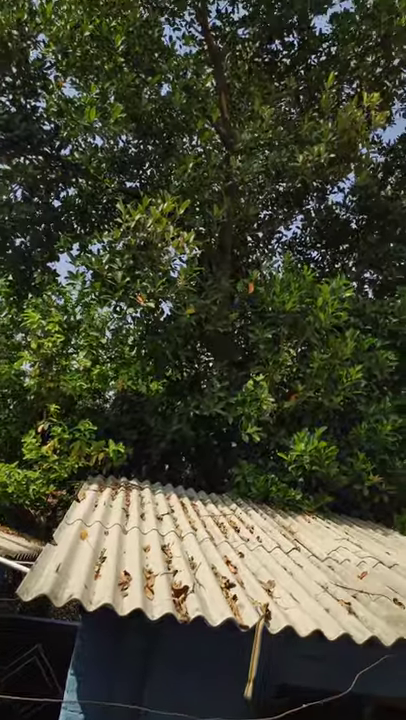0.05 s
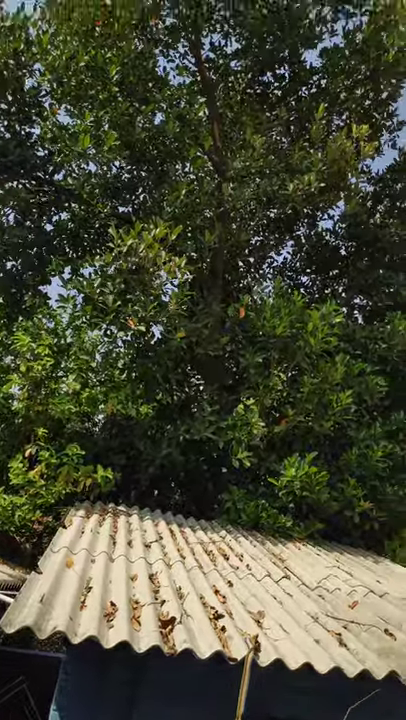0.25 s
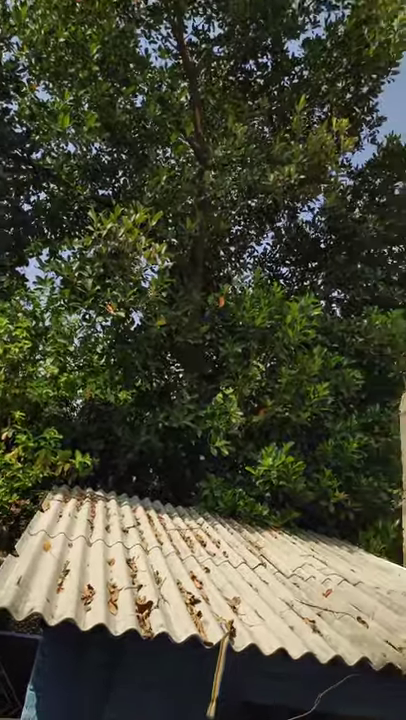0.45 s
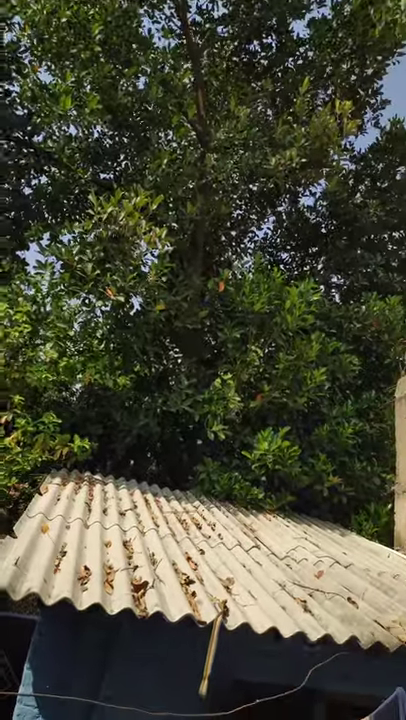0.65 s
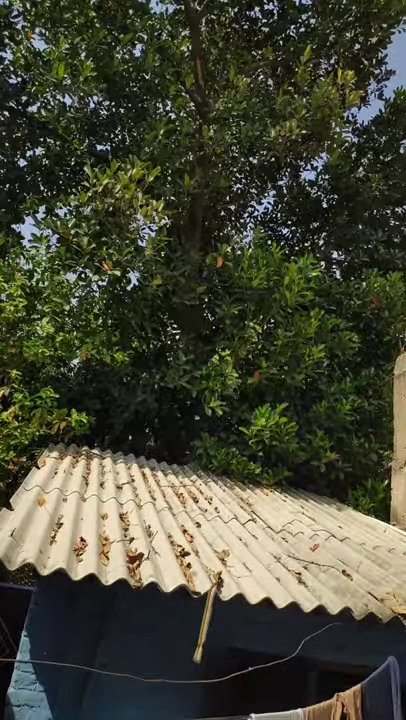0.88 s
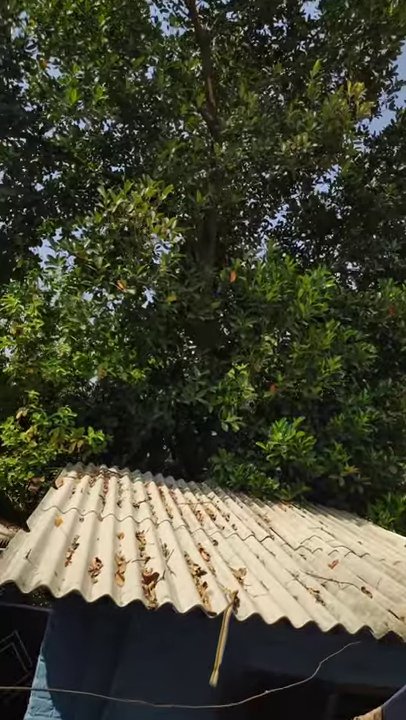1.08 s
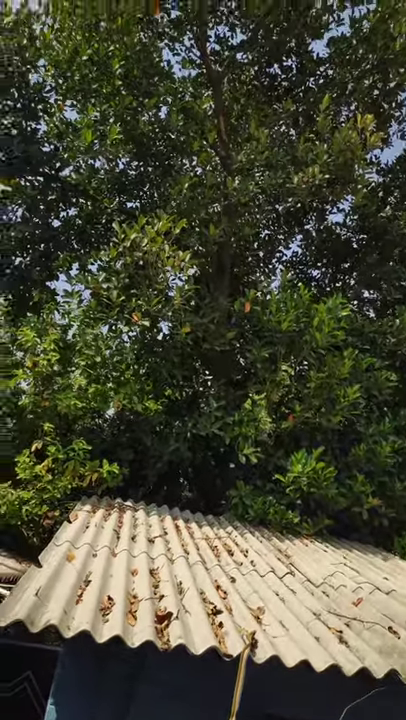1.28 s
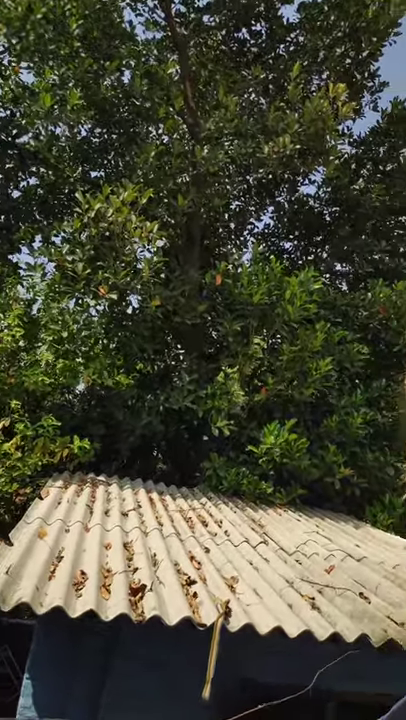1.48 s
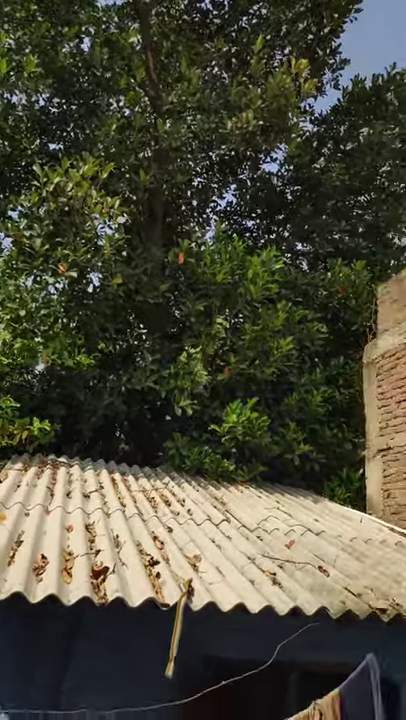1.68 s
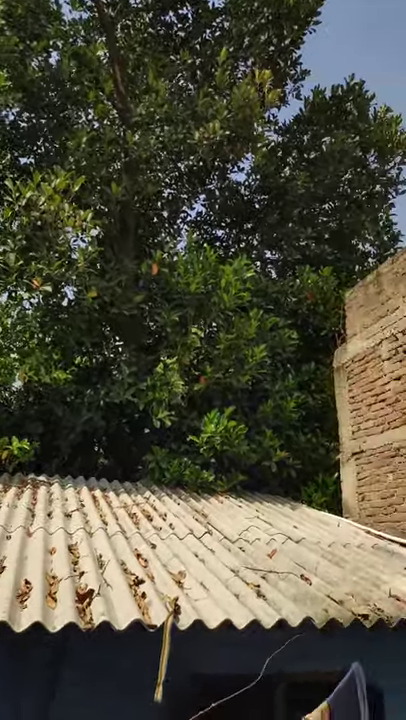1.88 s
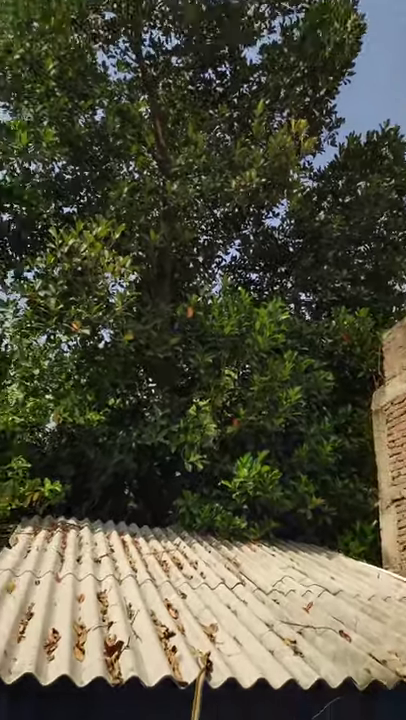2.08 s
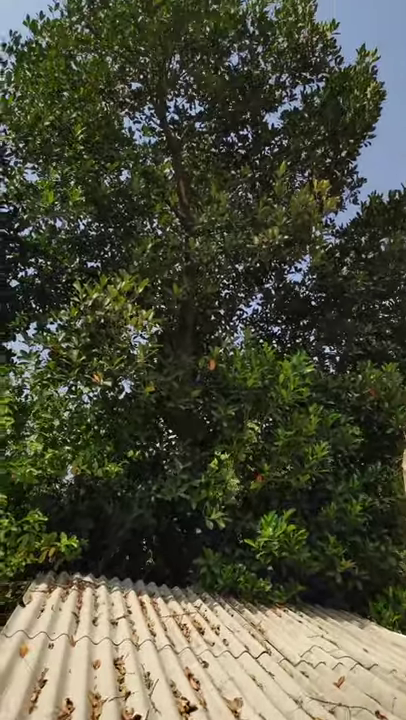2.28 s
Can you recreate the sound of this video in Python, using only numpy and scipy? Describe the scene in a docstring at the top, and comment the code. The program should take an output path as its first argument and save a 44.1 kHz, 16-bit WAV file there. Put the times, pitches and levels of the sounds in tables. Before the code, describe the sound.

A bird calls from a tree in a walled backyard: a low arching hoot, a high whistle that lifts and falls, then a softer sinking hoot. Leaves rustle briefly, and something nearby scuffs and taps faintly.

```python
"""First comes the fading ring of a whistle just ended, in a walled backyard. Then the bird in the tree
calls on: a low arching hoot, a high whistle that lifts and falls away, a sinking hoot. Each note is
nearly a pure tone with a thin reedy edge, and rings on between the house walls. Leaves rustle briefly,
something nearby scuffs and taps, and a faint low murmur of the surroundings lies underneath."""
import sys
import numpy as np
from scipy import signal
from scipy.fft import rfft, irfft, next_fast_len
from scipy.io import wavfile
from scipy.ndimage import uniform_filter1d

SR = 44100
rng = np.random.default_rng(int(sys.argv[2]) if len(sys.argv) > 2 else 0)


def inscribe(sig):
    """Save sig as 16-bit PCM at rate SR to the path in sys.argv[1].

    A 1-D sig is mono; a 2-D sig holds one channel per row.
    Samples are clipped to [-1, 1] before scaling.
    """
    pcm = np.round(np.clip(np.atleast_2d(sig).T, -1, 1) * 32767)
    wavfile.write(sys.argv[1], SR, pcm.astype(np.int16))


N = 108045
LEAD_IN = 2 * SR // 3  # samples of sound before the start


def amp(db):
    return 10 ** (np.asarray(db) / 20)


def clock():
    """Time of every sample in seconds, negative during the lead-in."""
    return np.arange(-LEAD_IN, N) / SR


def along(points, hz):
    """Read (f/Hz, value) points on a log frequency axis."""
    freqs, values = np.transpose(points)
    return np.interp(np.log(hz + 1), np.log(freqs + 1), values)


def curves(rows, t):
    """One automation curve for each column after the time."""
    times, *columns = np.transpose(rows)
    return [np.interp(t, times, column) for column in columns]


def wobble(rate, size=N + LEAD_IN):
    """Smooth random modulation, rate knots a second."""
    position = np.arange(size) * rate / SR
    knots, i = rng.standard_normal(4096), position.astype(int)
    u = position - i
    return knots[i] + (knots[i + 1] - knots[i]) * u * u * (3 - 2 * u)


def filtered(x, response):
    """Zero-phase EQ with gain response(hz)."""
    size = next_fast_len(x.shape[-1] + 8192)
    return irfft(rfft(x, size) * response(np.fft.rfftfreq(size, 1 / SR)), size)[..., :x.shape[-1]]


def noise(colour):
    """Coloured noise of rms 1."""
    x = filtered(rng.standard_normal(N + LEAD_IN), lambda hz: amp(along(colour, hz)))
    return x / x.std()


def swell(levels, colour, rough_db, lead_s=0):
    """Coloured noise that rides a level curve, a little unevenly."""
    t = clock() + lead_s
    db, = curves(levels, t)
    gate = (t > levels[0][0]) & (t < levels[-1][0])
    return amp(db + rough_db * wobble(64)) * noise(colour) * gate


JITTER, SHIMMER_DB, EDGE_FLUTTER_DB = 0.0016, 2.5, 1  # unsteady pitch (fraction), level and overtones
RASP_DB = -14  # phase noise that roughens each overtone, re 1 radian


def bird_note(rows, edge, rings, top_harmonic, lead_s=0, pitch_ratio=1):
    """A gliding tone, its octave, and faint overtones that flare as they cross the throat's rings."""
    t = clock() + lead_s
    on = (t > rows[0][0]) & (t < rows[-1][0])
    n = on.sum()
    hz, db, octave_db, edge_db, ring_db = uniform_filter1d(np.array(curves(rows, t[on])), size=400)
    hz = pitch_ratio * hz * (1 + JITTER * wobble(90, n))
    phase = 2 * np.pi * np.cumsum(hz) / SR
    tone = np.sin(phase) + amp(octave_db) * np.sin(2 * phase)
    for k in range(3, top_harmonic + 1):
        ring = sum(amp(peak) / (1 + ((k * hz - centre) / width) ** 4) for centre, width, peak in rings)
        gain = amp(edge_db + along(edge, k * hz)) + amp(ring_db) * ring
        flutter = amp(EDGE_FLUTTER_DB * wobble(45, n))
        rasp = amp(RASP_DB) * wobble(500, n)
        tone += gain * flutter * np.sin(k * phase + rasp)
    envelope = amp(db + SHIMMER_DB * wobble(60, n)) * signal.windows.tukey(n, .03)
    out = np.zeros(len(t))
    out[on] = np.sqrt(2) * envelope * tone
    return out


# the whistle's glide: t/s, f/Hz, level/dB, then re that level: octave/dB, edge/dB, throat ring/dB
WHISTLE_GLIDE = [(1.125, 1345, -57.5, -42, -24.5, -47), (1.14, 1409, -44, -25.5, -1, -22.5),
                 (1.17, 1335, -35, -32, 0, -17.5), (1.205, 1299, -33.5, -36.5, -5, -24),
                 (1.27, 1286, -37.5, -37, -2.5, -2), (1.335, 1308, -32, -40.5, -8.5, -17.5),
                 (1.39, 1408, -33, -38.5, -6, -30), (1.45, 1528, -31.5, -39.5, 5, -30.5),
                 (1.505, 1531, -36, -31.5, 7.5, -34.5), (1.535, 1395, -30.5, -42, -3, -24.5),
                 (1.562, 1221, -41, -44.5, -20, -34.5), (1.62, 1057, -51.5, -46, -33, -43),
                 (1.665, 846, -61, -32, -22, -51)]
WHISTLE_REED = [(3000, -46), (3800, -55), (4200, -41.5), (4600, -34), (5300, -32.5), (6100, -34),
                (7000, -30.5), (7700, -31), (8200, -39), (9000, -39.5), (9400, -41), (10400, -34.5),
                (11500, -43), (12300, -40), (13800, -44.5)]  # EQ of its reedy edge: f/Hz, level/dB
WHISTLE_THROAT = [(6870, 230, -3), (10770, 400, -25.5)]  # throat rings: f/Hz, half-width/Hz, level/dB
AIR_LEVEL = [(1.13, -91), (1.2, -78), (1.38, -80.5), (1.49, -68), (1.55, -57), (1.6, -64.5), (1.65, -92.5)]  # envelope of the rushing air: t/s, level/dB
AIR_EQ = [(1700, -31), (2300, -23), (2900, -1), (3700, -21.5), (4700, -5.5), (5500, -5), (6600, 2),
          (7500, -4.5), (8200, -8.5), (9500, -8.5), (10700, -5), (13500, -8)]  # its colour: f/Hz, level/dB


def whistle(lead_s=0, pitch_ratio=1):
    """The high note lifts and falls away, with a rush of air as it breaks off."""
    tone = bird_note(WHISTLE_GLIDE, WHISTLE_REED, WHISTLE_THROAT, top_harmonic=11,
                     lead_s=lead_s, pitch_ratio=pitch_ratio)
    return tone + swell(AIR_LEVEL, AIR_EQ, rough_db=1.8, lead_s=lead_s)


WALL_ECHOES = [(.031, -5.5), (.047, -23.5), (.072, -16), (.108, -17.5)]  # slaps off the house walls: delay/s, level/dB
TAIL_T60 = [(150, 0.2), (520, 0.82), (1400, 0.69), (3000, 0.38), (7000, .4), (13000, 0.16)]  # decay of the diffuse tail: f/Hz, t60/s
TAIL_EQ = [(200, -13), (550, -7), (1400, -5.5), (4000, 1), (8000, 2.5), (13000, -3.5)]  # its colour: f/Hz, level/dB
TAIL_RISE_S, WALL_DULL_HZ = 0.022, 1540


def yard(x):
    """Direct sound, dull echoes and a tail: rough walls mirror only the lows and scatter the rest."""
    hz, t, spectrum = signal.stft(rng.standard_normal(SR), SR, nperseg=256)
    decay = amp(-60 * t / along(TAIL_T60, hz)[:, None]) * (1 - np.exp(-t / TAIL_RISE_S))
    decay /= np.sqrt(SR * np.mean(decay ** 2, axis=1, keepdims=True))  # equal energy in every band
    tail = signal.istft(spectrum * decay * amp(along(TAIL_EQ, hz))[:, None], SR, nperseg=256)[1]
    echoes = np.zeros(len(tail))
    for delay, db in WALL_ECHOES:
        echoes[round(delay * SR)] += amp(db)
    response = tail + filtered(echoes, lambda hz: 1 / (1 + (hz / WALL_DULL_HZ) ** 2))
    return x + signal.fftconvolve(x, response)[:len(x)]


BED_LEVEL = [(0, -87.5), (.14, -89), (.26, -70.5), (.8, -77), (1.4, -76.5), (1.9, -72.5), (2.2, -72.5),
             (2.45, -81.5)]  # envelope of the background murmur: t/s, level/dB
BED_EQ = [(25, -29.5), (75, -26.5), (115, -12), (165, 1), (280, -3), (420, -10.5), (650, -21.5),
          (1000, -14.5), (1450, -13.5), (1800, -43), (4000, -51), (13000, -53.5)]  # its colour: f/Hz, level/dB
HISS_DB = -100


def murmur():
    """A low, wavering bed of the surroundings with a trace of white hiss."""
    db, = curves(BED_LEVEL, clock())
    bed = amp(db + 1.2 * wobble(23)) * noise(BED_EQ)
    return bed + amp(HISS_DB) * rng.standard_normal(len(db))


WIND_LEVEL = [(.15, -112), (.4, -91.5), (.56, -81.5), (.7, -91), (.9, -110)]  # envelope of the puff of wind: t/s, level/dB
WIND_EQ = [(20, -13), (45, 1.5), (90, -18), (200, -44.5), (600, -79)]  # its colour: f/Hz, level/dB


def wind_puff():
    """One puff of wind buffets the microphone with a faint, deep rumble."""
    return swell(WIND_LEVEL, WIND_EQ, rough_db=5.5)


# the first hoot's glide: t/s, f/Hz, level/dB, then re that level: octave/dB, edge/dB, throat ring/dB
ARCHING_GLIDE = [(.208, 573, -68, -6, -26.5, -28.5), (.23, 571, -40.5, -9, -26.5, -37),
                 (.255, 592.7, -26.5, -27, -36, -46), (.285, 652, -36.5, -31, -26, -56.5),
                 (.33, 693, -36.5, -36.5, -16, -35.5), (.37, 636.3, -36, -30.5, -24.5, -54),
                 (.415, 587.5, -29, -35, -21, -69.5), (.48, 548, -31, -31.5, 0, -39),
                 (.56, 544.1, -28, -22.5, -8, -50), (.615, 530.3, -29.5, -24.5, -1, -53.5),
                 (.655, 479.5, -31.5, -31, -26.5, -65.5), (.69, 446.6, -54, -20, -24, -60)]
ARCHING_REED = [(1650, -51.5), (2200, -47.5), (2750, -60.5), (3250, -56), (3850, -41.5), (4400, -66.5),
                (5000, -44.5), (5600, -79), (7100, -60.5), (7700, -68), (8600, -48.5), (9300, -58.5),
                (10000, -89), (10900, -66), (12000, -96.5)]  # EQ of its reedy edge: f/Hz, level/dB
ARCHING_THROAT = [(5063, 190, 0.5), (4105, 79, -15.5), (8800, 370, -18.5)]  # throat rings: f/Hz, half-width/Hz, level/dB
HOARSE_LEVEL = [(.22, -100), (.28, -90.5), (.43, -87), (.48, -70.5), (.56, -69), (.62, -77.5), (.68, -100)]  # envelope of its hoarseness: t/s, level/dB
HOARSE_EQ = [(700, 5.5), (1000, 10.5), (1500, -0.5), (1850, -8.5), (2250, -0.5), (2700, -5.5), (3100, 1),
             (3600, -9.5), (4400, -6.5), (5600, -23), (7000, -14), (7700, -16.5), (8700, -8.5),
             (9500, -19.5), (10300, -35), (13000, -42.5)]  # colour of the hoarseness: f/Hz, level/dB


def arching_hoot():
    """A low note that rises and falls, turning hoarse on the way down."""
    tone = bird_note(ARCHING_GLIDE, ARCHING_REED, ARCHING_THROAT, top_harmonic=20)
    return tone + swell(HOARSE_LEVEL, HOARSE_EQ, rough_db=1.0)


FAR_LEVEL = [(.22, -110), (.29, -77), (.45, -85.5), (.62, -79), (.78, -71), (1.1, -69), (1.33, -83.5),
             (1.4, -105)]  # envelope of the far-off noise: t/s, level/dB
FAR_EQ = [(900, -58.5), (1400, -6.5), (1600, -6), (1850, -1), (2050, -14.5), (2400, -50.5), (4000, -71)]  # its colour: f/Hz, level/dB


def far_noise():
    """A faint, flickering band of far-off noise near 1.8 kHz."""
    return swell(FAR_LEVEL, FAR_EQ, rough_db=1.5)


LEAF_LEVEL = [(.82, -103.5), (.85, -76.5), (.88, -61.5), (.94, -60.5), (.99, -69.5), (1.08, -68.5),
              (1.15, -78.5), (1.25, -63), (1.34, -76), (1.4, -90)]  # envelope of the rustle: t/s, level/dB
LEAF_EQ = [(500, -14), (900, -7.5), (1200, 2.5), (1900, 3.5), (3000, 0), (4500, -2.5), (7000, 0.5),
           (10000, -14), (13500, -9)]  # its colour: f/Hz, level/dB


def leaves():
    """Leaves brush together in a brief, bright rustle."""
    return swell(LEAF_LEVEL, LEAF_EQ, rough_db=1.1)


SCUFF_STROKES = [(1.476, .06, -65.5), (1.549, 0.097, -59.5), (1.803, 0.043, -57), (1.876, 0.15, -64.5)]  # one row a scuff: t/s, length/s, level/dB
SCUFF_EQ = [(60, -31.5), (150, -4), (280, -1), (550, -1.5), (800, -3), (1400, 6.5), (1800, -6.5),
            (2300, -15.5), (2900, -41), (6000, -50), (10000, -46.5), (14000, -56)]  # their colour: f/Hz, level/dB


def scuffs():
    """Something scuffs nearby: soft, grainy strokes of noise over a faint floor."""
    t = clock()
    strokes = 0
    for start, length, db in SCUFF_STROKES:
        corners = [start, start + 0.0032, start + length, start + length + 0.029]
        strokes += amp(db) * np.interp(t, corners, [0.023, 1, 0.71, 0.053])
    grain = amp(2.5 * wobble(150))
    return strokes * grain * noise(SCUFF_EQ)


TAP_EQ = [(40, -57), (90, -27), (220, 0), (800, -2.5), (1500, 7), (2200, -15), (3600, -26.5), (5000, -17.5),
          (12000, -23)]  # colour of the tap: f/Hz, level/dB
TAP_S, TAP_DB, TAP_T60_S = 1.542, -43.5, 0.075


def tap():
    """One tap nearby: a noise burst with a hard attack and a fast decay."""
    age = clock() - TAP_S
    return amp(TAP_DB - 60 * np.abs(age) / TAP_T60_S) * (age > 0) * noise(TAP_EQ)


# the last hoot's glide: t/s, f/Hz, level/dB, then re that level: octave/dB, edge/dB, throat ring/dB
SINKING_GLIDE = [(1.855, 827, -65, -31.5, -56, -64.5), (1.875, 820.4, -40, -20.5, -45, -55.5),
                 (1.899, 814.3, -50, -21, -54.5, -59.5), (1.91, 750.3, -38.5, -15.5, -55, -38),
                 (1.96, 591.7, -36.5, -19, -33, -26.5), (2.025, 526.5, -40, -25.5, -31.5, -26.5),
                 (2.06, 492.3, -44.5, -4.5, -17.5, -10.5), (2.13, 501.1, -42, -16, -15, -25),
                 (2.2, 511.1, -41.5, -12.5, -5, -29), (2.28, 497.7, -59.5, -7, 6, -34),
                 (2.33, 492, -44, -12.5, -22.5, -45.5), (2.38, 485, -63, -17, -30, -52)]
SINKING_REED = [(1500, -17), (2050, -29.5), (2550, -55), (3050, -33), (3550, -33.5), (4050, -43.5),
                (4550, -35.5), (5050, -26), (5600, -35.5), (6100, -49.5), (7500, -69), (8800, -62),
                (9500, -53), (10200, -56), (11500, -81)]  # EQ of its reedy edge: f/Hz, level/dB
SINKING_THROAT = [(5420, 140, -5), (4310, 218, -18)]  # throat rings: f/Hz, half-width/Hz, level/dB


def sinking_hoot():
    """A softer note that slides down and settles near 500 Hz."""
    return bird_note(SINKING_GLIDE, SINKING_REED, SINKING_THROAT, top_harmonic=20)


def scene():
    """The bird, scuffs and tap ring in the yard; the surroundings are mixed in dry."""
    # this whistle ends in the lead-in, so only its ring is heard
    opening_whistle = amp(-1.5) * whistle(lead_s=1.733, pitch_ratio=0.95)
    bird = opening_whistle + arching_hoot() + whistle() + sinking_hoot()
    mix = yard(bird + scuffs() + tap()) + murmur() + leaves() + far_noise() + wind_puff()
    return mix[None, LEAD_IN:]


FADE_S, TOP_HZ = .006, 14000


def record(dry):
    """A quick fade-in and a brick-wall high cut."""
    fade_in = np.minimum(np.arange(N) / SR / FADE_S, 1)
    return filtered(dry * fade_in, lambda hz: hz < TOP_HZ)


dry = scene()
out = record(dry)
inscribe(out)
```